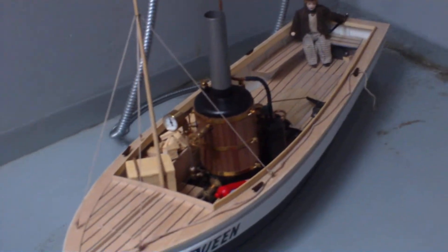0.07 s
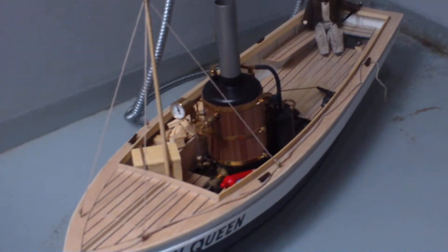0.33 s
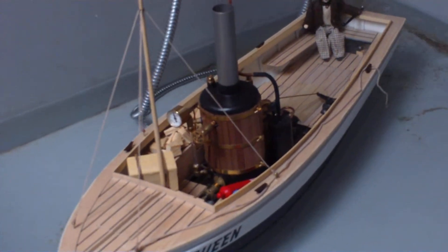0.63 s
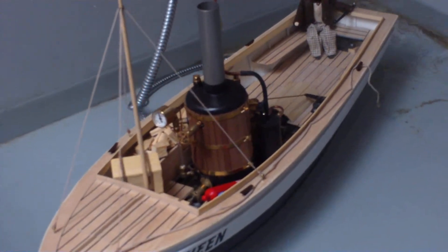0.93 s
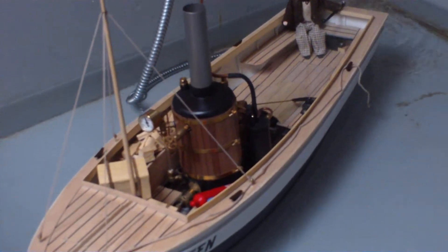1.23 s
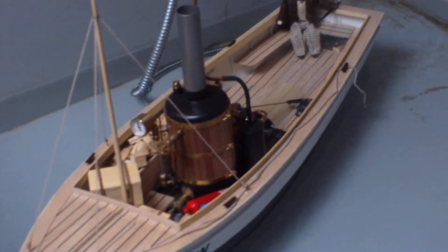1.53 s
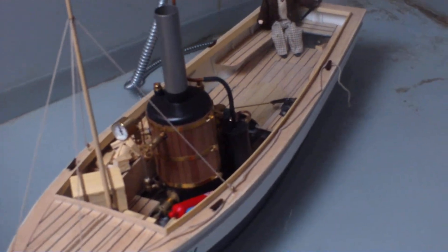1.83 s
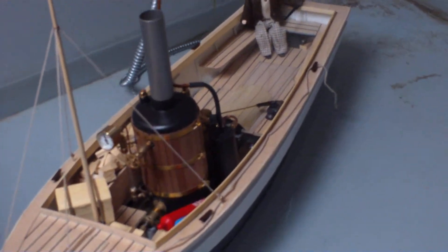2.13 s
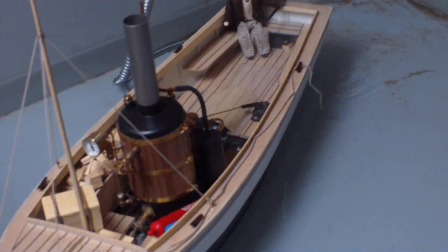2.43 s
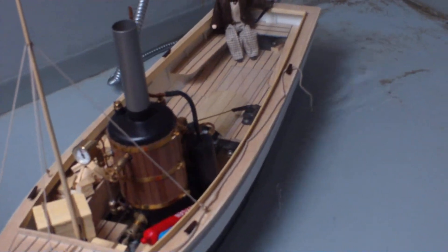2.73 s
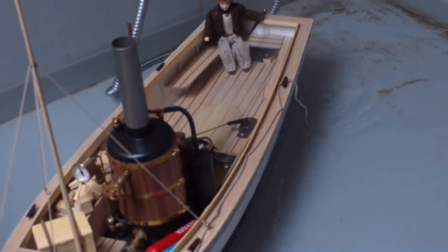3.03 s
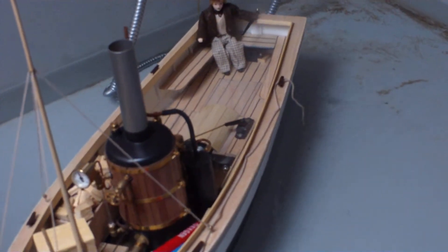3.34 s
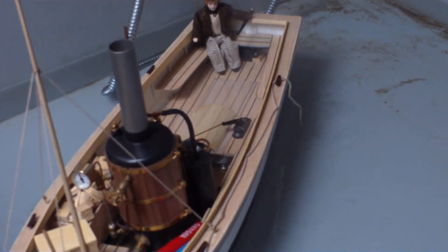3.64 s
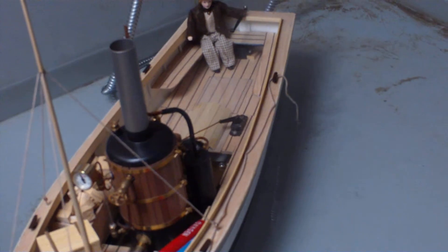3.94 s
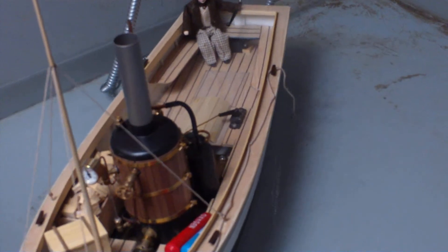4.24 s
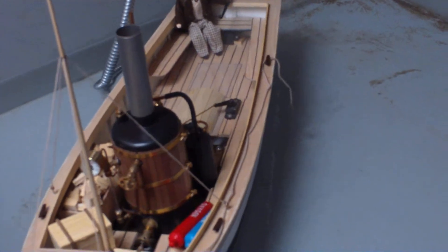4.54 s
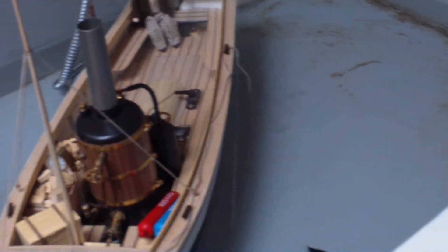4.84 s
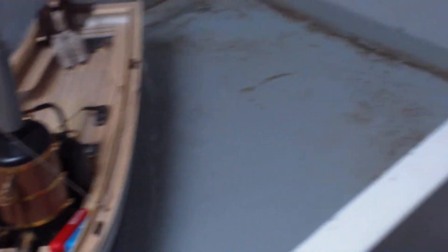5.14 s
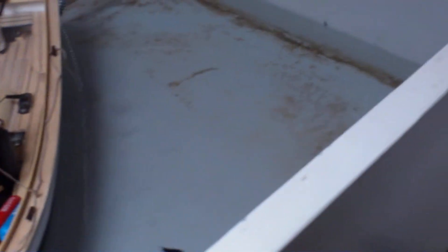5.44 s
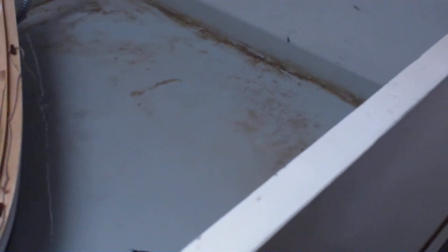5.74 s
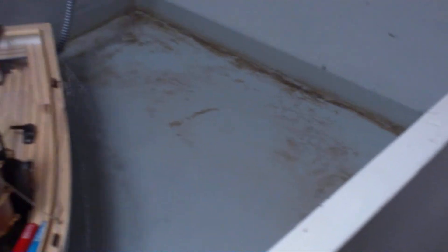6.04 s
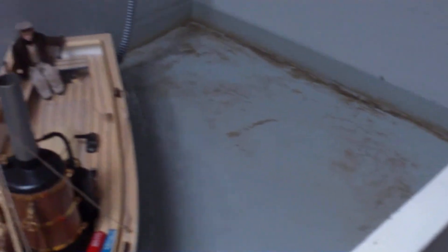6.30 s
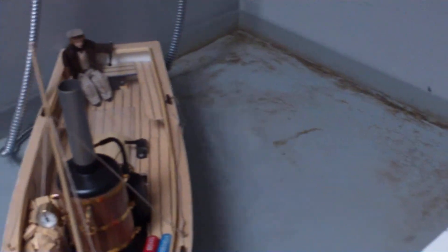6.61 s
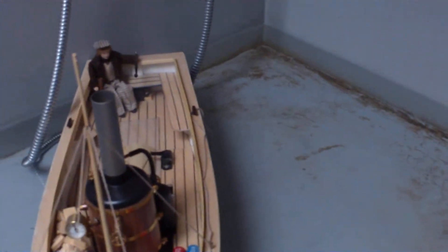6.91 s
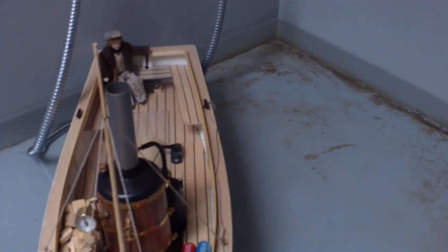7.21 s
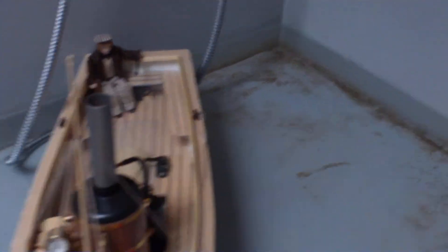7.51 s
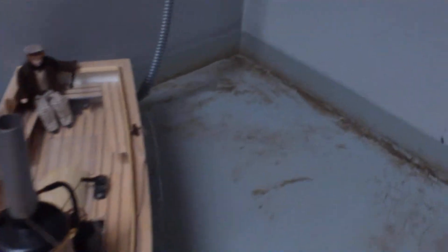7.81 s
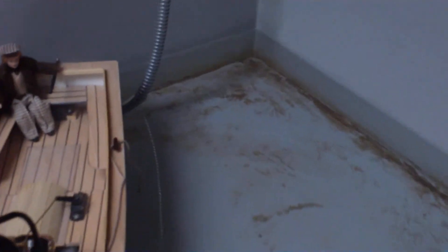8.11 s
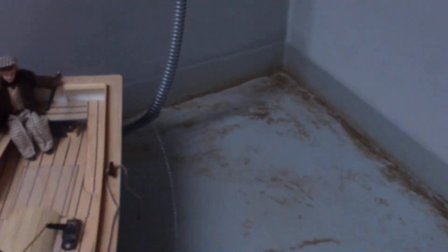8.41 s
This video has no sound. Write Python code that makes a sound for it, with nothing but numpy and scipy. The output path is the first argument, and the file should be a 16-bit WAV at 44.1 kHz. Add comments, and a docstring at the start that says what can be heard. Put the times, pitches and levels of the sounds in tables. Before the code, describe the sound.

Fast puffing and mechanical chatter from a miniature steam engine, stopping and starting once, over a gas burner's continuous hollow roar.

```python
"""A model steam launch floats in a small tank, its gas burner's roar fluttering in the flue throughout.
First the engine runs astern for a second: two puffs of steam a turn, over knocking rods, rattling gears
and a shaft that hums in the wooden hull. It stops, and steam leaks past the throttle. From 1.8 to 4.7 s
it runs ahead, and leaks again. The burner carries on, a soft bump passes at 5.8 s, and the rumble of
the open flame swells toward the end."""
import sys
import numpy as np
from scipy import signal
from scipy.fft import rfft, irfft, next_fast_len
from scipy.io import wavfile
from scipy.ndimage import uniform_filter1d

SR = 44100
rng = np.random.default_rng(int(sys.argv[2]) if len(sys.argv) > 2 else 0)


def to_wav(sig):
    """Store sig (one row per channel, or 1-D mono) as 16-bit WAV at the path in sys.argv[1].

    Samples outside -1..1 are clipped; the rate is SR.
    """
    pcm = np.clip(np.atleast_2d(sig), -1, 1) * 32767
    pcm = np.round(pcm).astype(np.int16)
    wavfile.write(sys.argv[1], SR, pcm.T)  # frames by channels


N = 377496
TIME = np.arange(N) / SR

# beats astern, one row a turn: start_s, main_puff_db, return_puff_db
ASTERN_PUFFS = [(0.041, -28.5, -30.5), (0.128, -31.5, -34), (0.215, -30, -31.5), (0.303, -26.5, -31.5),
                (0.39, -29.5, -30.5), (0.478, -31, -29.5), (0.566, -27, -33), (0.656, -30, -31.1),
                (0.743, -29, -34), (0.83, -29.5, -35)]
# beats ahead, starting slowly, overshooting and settling: start_s, main_puff_db
AHEAD_PUFFS = [(1.854, -27.5), (1.954, -23), (2.043, -21.5), (2.127, -23.0), (2.21, -21.5), (2.293, -23),
               (2.381, -24), (2.471, -24.5), (2.561, -25.5), (2.649, -23.5), (2.735, -23), (2.82, -25.5),
               (2.904, -24), (2.99, -23.5), (3.074, -23.7), (3.158, -22.8), (3.243, -23.3), (3.327, -23),
               (3.412, -23), (3.496, -23), (3.58, -22.5), (3.665, -23.5), (3.749, -23), (3.833, -23.0),
               (3.918, -23), (4.005, -26), (4.092, -23.5), (4.177, -23.5), (4.26, -23), (4.345, -23),
               (4.431, -22.5), (4.515, -22.5), (4.599, -23.5), (4.684, -30)]
# tone of the exhaust, valve gear, rod knocks and hull: frequency_hz, gain_db
EXHAUST_COLOUR = [(300, -19), (700, 1), (1050, 4), (1250, -8), (1700, -2.5), (2600, -1.5), (3300, -5),
                  (4000, -6.5), (4800, -0.5), (5900, -3), (6900, -11.5)]
VALVE_COLOUR = [(300, -31), (900, 1.5), (1800, -9), (3200, -3.5), (3900, -3), (4800, -6.5), (7000, -17)]
KNOCK_COLOUR = [(400, -17.5), (1500, -0.5), (2400, -1), (3400, -6), (4400, 0.5), (5400, 0.5), (6300, -3.5),
                (7200, -15.5)]
HULL_COLOUR = [(20, -41.5), (40, -30), (60, -11), (100, -28.5), (130, -8), (250, 0.5), (440, -0.5),
               (530, -3.5), (780, 11.5), (1200, 3), (2600, 0), (3300, -7), (5000, -7.5), (7000, -31)]
# resonances of the exhaust pipe each way, valve gear, rod knocks and hull: pitch_hz, width_hz, boost_db
ASTERN_PIPE = [(674, 67, 13), (1065, 23, 15), (1875, 54, 14), (2050, 70, 12), (2530, 57, 10), (4000, 90, 3),
               (4430, 200, 3)]
AHEAD_PIPE = [(613, 39, 9.1), (825, 70, 7.4), (950, 38, 16), (1409, 20, 22.6), (1677, 29, 7.3),
              (1744, 84, 8), (2200, 54, 2.1), (2810, 110, 4.9), (4010, 67, 4.2)]
VALVE_PEAKS = [(960, 49, 5), (1816, 37, 27.5), (2430, 37, 4.1), (4070, 60, 5.1)]
KNOCK_PEAKS = [(1990, 90, 7.7), (3560, 90, 5), (4500, 170, 5)]
HULL_PEAKS = [(247, 57, 4.2), (342.3, 12, 9.3), (379, 14, 6.8), (525, 10, 13), (610, 13, 10.2),
              (968, 22, 12.2), (1810, 59, 5.1), (2370, 110, 2.5)]
# the pipe's main note builds through the run ahead: time_s, gain_db
PIPE_NOTE_SWELL = [(1.9, -13), (3, -10), (3.9, -4), (4.6, -2)]
# ring of the brass valve rod: pitch_hz, t60_s, gain_db
ROD_RING = [(1850, .06, -2), (2060, .05, -5), (4450, 0.035, -5), (4840, 0.05, .5), (5210, 0.025, -4),
            (5780, .025, -8)]
# slack in the rod and crank knocks each turn: after_puff_s, against_puff_db, decay_s
ASTERN_KNOCKS = [(0, 7, .004), (.0185, 2, .0015)]
AHEAD_KNOCKS = [(-.0035, -4.5, 0.0057), (.002, 0.5, 0.0039), (.019, -4, .007), (.048, -7, 0.01)]
# load on the gears and shaft: time_s, level_db
ASTERN_LOAD = [(0, -32.5), (.55, -35), (.85, -34), (.93, -41.5), (1.0, -45.5), (1.15, -46)]
AHEAD_LOAD = [(1.7, -50), (1.81, -38.5), (1.9, -34), (2.05, -33), (2.5, -33), (2.9, -32), (4.65, -32),
              (4.78, -42), (4.98, -52)]
# harmonics of the shaft's hum: cycles_per_turn, gain_db
ASTERN_HUM = [(7, -26.5), (11, -12), (12, -16), (13, -29), (14, -14.5)]
AHEAD_HUM = [(5, -41), (7, -31), (11, -24.5), (12, -22), (13, -21), (14, -14), (15, -26.5), (16, -22),
             (17, -16.5), (18, -27), (19, -21.5), (20, -25.5), (21, -25.5)]
# drone of a hull panel: time_s, level_db
ASTERN_DRONE = [(0, -41), (.3, -42), (.55, -37.5), (.7, -46), (.9, -67), (1, -90)]
AHEAD_DRONE = [(1.7, -95), (1.95, -50), (2.1, -38.5), (2.3, -43), (2.5, -38), (2.75, -45.5), (4.6, -59),
               (4.8, -91)]

# slow moves of the burner: time_s, flue_pitch_hz, upper_mode_db, jet_hiss_db
FLAME_MOVES = [(0, 663, -38.5, -33), (.9, 604, -33, -34.5), (1.15, 640, -33.5, -37),
               (1.6, 620, -32.5, -36.5), (3, 632, -36, -35.5), (4.8, 642, -35, -36), (5.4, 647, -37, -37.5),
               (6.3, 672, -38.5, -37), (7.0, 652, -37, -36.5), (7.3, 670, -36, -37.5), (7.7, 685, -31, -36),
               (8.1, 687, -35.5, -36), (8.5, 669, -31.5, -36)]
# swells of the roar, burner mouth, funnel ring and boiler boom: time_s, level_db
ROAR_SWELL = [(0, -24), (.28, -24), (.47, -21), (.7, -22), (.92, -22.5), (1.2, -23), (1.5, -25),
              (1.77, -20.5), (1.95, -23.5), (4.1, -26.5), (4.4, -26.5), (5.1, -24), (5.35, -27.5),
              (5.65, -23.5), (6.2, -24), (6.45, -26), (6.62, -23), (6.8, -28), (7.0, -23.5), (7.3, -26.5),
              (7.45, -25.5), (8.28, -21.5), (8.42, -30), (8.56, -22.5)]
MOUTH_SWELL = [(0, -69.5), (6.6, -63.5), (7.3, -49), (7.9, -44.5), (8.3, -34), (8.56, -35.5)]
FUNNEL_SWELL = [(0, -5), (1.3, 6), (3, -5), (4.9, 3), (5.6, 3.5), (7.25, 2), (7.8, 3.5), (8.56, -4.5)]
BOOM_SWELL = [(0, -45.5), (1.1, -46), (1.7, -49.5), (3, -45), (5.6, -58.5), (7.2, -49.5), (8.4, -49)]
# glides of the upper flue mode and the gas jet's whistle: time_s, pitch_hz
UPPER_GLIDE = [(0, 1400), (1.2, 1407), (1.7, 1377), (3.3, 1398), (8.56, 1400)]
WHISTLE_GLIDE = [(0, 5580), (5, 5790), (6.3, 5710), (7.4, 5520), (8.1, 5800), (8.56, 5510)]
# brief dips in the roar's level, often just before a surge: centre_s, dip_db, half_length_s
ROAR_DIPS = [(0.12, -10, .011), (.543, -6, 0.025), (.627, -14, 0.016), (1.525, -4.5, .018),
             (1.62, -6, 0.0071), (1.716, -11, 0.014), (1.821, -6, 0.022), (1.954, -10, .018),
             (2.509, -12, 0.014), (4.49, -10, 0.011), (4.843, -4, .009), (4.883, -4.5, .014),
             (5.207, -5, .016), (5.692, -12, 0.0091), (5.737, -15, 0.011), (5.949, -7, 0.011),
             (7.083, -9, 0.0089), (7.398, -4.5, .01), (7.503, -3, .006), (7.665, -13, 0.0073)]
# brief loud surges in the fluttering roar: peak_s, level_db, length_s, pitch_hz
ROAR_SURGES = [(0.007, -14.5, 0.025, 635), (0.03, -15, 0.016, 633), (0.123, -13.5, 0.0094, 625),
               (0.137, -19.5, 0.011, 625), (0.195, -16.5, 0.017, 643), (0.36, -16.5, 0.0082, 627),
               (0.384, -14.5, 0.015, 608), (0.438, -17, 0.0076, 650), (0.491, -14.5, 0.01, 645),
               (0.508, -18.5, 0.0042, 605), (0.59, -17.5, 0.011, 670), (0.766, -12.5, 0.007, 660),
               (0.816, -8.5, 0.0057, 623), (0.871, -16.5, 0.01, 634), (0.911, -15, 0.0076, 630),
               (0.922, -14, 0.008, 634), (0.938, -18, 0.0051, 640), (1.066, -21, 0.01, 646),
               (1.11, -19.5, 0.0087, 630), (1.181, -18, 0.016, 664), (1.216, -18.5, 0.012, 615),
               (1.285, -16.5, 0.0076, 648), (1.303, -18.5, 0.011, 614), (1.63, -17.5, 0.0091, 606),
               (1.758, -18.5, 0.013, 638), (1.769, -15, 0.0087, 610), (1.789, -16.5, 0.018, 614),
               (3.385, -18, 0.024, 624), (3.883, -17, 0.019, 618), (4.221, -18, 0.013, 657),
               (4.387, -18, 0.037, 622), (4.611, -16, 0.012, 630), (4.767, -20, 0.018, 630),
               (4.858, -17.5, 0.007, 640), (4.928, -18, 0.01, 656), (5.101, -19.5, 0.0086, 655),
               (5.175, -21, 0.019, 622), (5.633, -19.5, 0.019, 634), (5.706, -15, 0.0094, 638),
               (5.752, -18, 0.0085, 648), (5.839, -19, 0.0091, 636), (5.962, -19, 0.007, 620),
               (6.079, -14, 0.011, 622), (6.102, -18, 0.0093, 664), (6.224, -16, 0.013, 617),
               (6.239, -17, 0.0071, 655), (6.926, -17.5, 0.014, 664), (7.097, -17, 0.0072, 635),
               (7.156, -20, 0.023, 648), (7.411, -14.5, 0.0061, 669), (7.491, -16.5, 0.009, 677),
               (7.513, -16, 0.0052, 680), (7.588, -18, 0.0091, 670), (7.675, -20.5, 0.01, 710),
               (7.833, -18, 0.012, 677), (7.873, -17.5, 0.011, 666), (7.965, -18, 0.024, 662),
               (7.99, -21, 0.018, 688), (8.19, -22, 0.0093, 696)]
# tone of the flame's rush, gas jet and burner mouth: frequency_hz, gain_db
RUSH_COLOUR = [(30, -58.5), (100, -30), (190, -20), (230, -16.5), (420, -9), (520, 3), (780, 9), (890, -16),
               (1100, -3.5), (1300, -3), (1600, -5.5), (2300, -17), (2800, -16), (5000, -39)]
JET_COLOUR = [(100, -37), (800, -21), (2000, 1.5), (3000, -1), (4200, 0.5), (5200, 2.5), (5700, 3.5),
              (6100, 1), (6700, -0.5), (7200, -8)]
MOUTH_COLOUR = [(30, -20), (90, -16), (130, -4.5), (180, -18), (260, -3), (330, -7.5), (420, 5),
                (800, -3.5), (950, -7), (1250, -9), (2600, -23), (3600, -7.5), (4300, -23.5), (7000, -36.5)]
# resonances of the rush and burner mouth: pitch_hz, width_hz, boost_db
RUSH_PEAKS = [(217, 39, 9.7), (510.4, 13, 7.9), (1720, 79, 2.7), (2250, 400, 6.8)]
MOUTH_PEAKS = [(930, 41, 25), (1120, 54, 14), (2100, 120, 11)]
# faint steady tones of the burner: pitch_hz, level_db
BURNER_TONES = [(124, -84), (2266, -51.5), (2311, -53), (2358, -57.5)]
# hollow side resonances of the funnel, shifting in balance: pitch_hz, start_db, end_db
FUNNEL_MODES = [(856.4, -41.5, -47), (978, -51.5, -38.5), (1070, -58.5, -44), (1178, -52, -48.5),
                (1250, -52, -50.5), (1336, -44.5, -48.5), (1456, -52.5, -44)]

# steam leaks after the throttle shuts: peak_s, level_db, half_length_s
STEAM_LEAKS = [(1.15, -37, 0.13), (4.769, -42, 0.17)]
# soft bumps: start_s, level_db
SOFT_BUMPS = [(5.82, -39.5)]
# tone of the leaks, room and bump: frequency_hz, gain_db
LEAK_COLOUR = [(1000, -20.5), (3500, -8), (5000, -1.5), (5700, 5), (6600, 3), (7200, -8.5)]
ROOM_COLOUR = [(20, -5.5), (35, -4.5), (58, 4.5), (90, -4.5), (130, 5), (200, -9), (1000, -8),
               (7000, -27.5)]
BUMP_COLOUR = [(20, -8), (45, 6.5), (90, -12), (140, 3.5), (300, 4), (450, 0.5), (900, -25), (3000, -55)]


def engine_astern():
    """A short run with two crisp beats a turn."""
    steam = exhaust(ASTERN_PUFFS, ASTERN_PIPE, gain_db=3, hold_s=0.0063, delays_s=(-0.0013, 0.0445),
                    decays_s=(0.013, 0.04), spit_db=0, tick_db=10, ring_db=7)
    gears = gears_and_shaft(ASTERN_PUFFS, ASTERN_LOAD, ASTERN_HUM, rattle_db=5.5, hum_db=0, rub_db=6.5)
    return steam + rod_knocks(ASTERN_PUFFS, ASTERN_KNOCKS) + gears + panel_drone(ASTERN_DRONE, hz=249.6)


def engine_ahead(return_db=-13):
    """A longer run: one long beat a turn, a faint return puff, and a wavering pipe note that builds."""
    puffs = [(s, db, db + return_db) for s, db in AHEAD_PUFFS]
    steam = exhaust(puffs, AHEAD_PIPE, gain_db=2.5, hold_s=0.011, delays_s=(0.0013, 0.055),
                    decays_s=(0.03, 0.038), spit_db=-0.3, tick_db=-9, ring_db=-6.5)
    gears = gears_and_shaft(puffs, AHEAD_LOAD, AHEAD_HUM, rattle_db=0.5, hum_db=4.5, rub_db=4.5)
    note = resonate(steam, 963 + 9 * drift(25), width_hz=52) * amp(curve(PIPE_NOTE_SWELL))
    return steam + note + rod_knocks(puffs, AHEAD_KNOCKS) + gears + panel_drone(AHEAD_DRONE, hz=248)


def exhaust(puffs, pipe, gain_db, hold_s, delays_s, decays_s, spit_db, tick_db, ring_db):
    """Each port opens with a metallic tick and blows down. Delays and decays are (main, return) pairs."""
    t = TIME[:SR // 8]
    flow, ticks, rings = np.zeros((3, N))
    crack = 1 + 0.32 * np.exp(-t / 0.0028)  # first burst as the port cracks open
    opening = (1 - np.exp(-(t / 0.001) ** 2)) * crack
    contact = 1 - np.exp(-(t / 0.0021) ** 2)
    tick = contact * np.exp(-t / 0.0094)
    for s, *levels_db in puffs:
        for db, delay_s, decay_s in zip(levels_db, delays_s, decays_s):
            start = s + delay_s
            puff = opening * np.exp(-np.maximum(t - hold_s, 0) / decay_s)
            add(flow, start, (amp(db) * puff) ** 2)
            add(ticks, start + 0.0017, amp(db + tick_db) * tick * noise(len(t)))
            for hz, t60, mode_db in ROD_RING:
                phase = 2 * np.pi * (hz * (1 + 0.01 * rng.standard_normal()) * t + rng.random())
                envelope = amp(db + ring_db + mode_db - 60 * t / t60) * contact
                add(rings, start + 0.0027, envelope * np.sin(phase))
    steam = unit_rms(noise() * amp(spit_db * drift(500)))  # spit_db: depth of wet steam's flicker
    chuffs = amp(gain_db) * body(steam * np.sqrt(flow), EXHAUST_COLOUR, pipe)
    return chuffs + body(ticks, VALVE_COLOUR, VALVE_PEAKS) + rings


def rod_knocks(puffs, pattern, spread_db=1.5):
    """The rod and crank take up their slack with short, bright clacks, as hard as the steam pushes."""
    t, clacks = TIME[:SR // 20], np.zeros(N)
    for s, puff_db, *_ in puffs:
        for delay_s, db, decay_s in pattern:
            force = amp(puff_db + db + spread_db * rng.standard_normal())
            add(clacks, s + delay_s, force * np.exp(-t / decay_s) * noise(len(t)))
    return body(clacks, KNOCK_COLOUR, KNOCK_PEAKS)


def crank_turns(puffs):
    """Running count of crank turns: one from each main puff to the next, smoothed by the flywheel."""
    s = np.asarray(puffs)[:, 0]
    speed = np.interp(TIME, (s[1:] + s[:-1]) / 2, 1 / np.diff(s))
    turns = np.cumsum(uniform_filter1d(speed, 8192)) / SR
    return turns - np.interp(s[0], TIME, turns)


def gears_and_shaft(puffs, load, harmonics, rattle_db, hum_db, rub_db, teeth=44):
    """Gear teeth knock in nearly the same pattern each turn; the shaft hums and rubs in the hull."""
    turns = crank_turns(puffs)
    start, end = load[0][0], load[-1][0]
    running = np.interp(TIME, [start - .1, start - .05, end - .1, end], [0, 1, 1, 0])
    effort = running * np.maximum(amp(curve(load)) - amp(-55), 0)
    tooth = np.floor(turns * teeth + .12 * drift(150)).astype(int)
    hits = np.flatnonzero(np.diff(tooth) > 0)
    bite = noise(teeth)  # each tooth has its own
    rattle = np.zeros(N)
    rattle[hits] = bite[tooth[hits] % teeth] + 0.31 * noise(len(hits))
    scrape = noise(SR // 50) * np.exp(-TIME[:SR // 50] / 0.0096)
    rub_power = signal.oaconvolve(rattle ** 2, scrape ** 2)[:N].clip(0)
    rub = unit_rms(np.sqrt(rub_power) * noise())
    shake = amp(rattle_db) * unit_rms(rattle) + amp(rub_db) * rub
    hum = np.zeros(N)
    for order, db in harmonics:
        level = amp(db + 1.2 * drift(2))
        hum += level * np.sin(2 * np.pi * (order * turns + rng.random()) + .5 * drift(3))
    return effort * (body(shake, HULL_COLOUR, HULL_PEAKS) + amp(hum_db) * hum)


def panel_drone(swell, hz, waver_db=2, slip_rad=0.7):
    """The shaft shakes a hull panel at the panel's own note, unsteadily."""
    level = amp(curve(swell) + waver_db * drift(32))
    return level * np.sqrt(2) * np.sin(2 * np.pi * hz * TIME + slip_rad * drift(10))


def burner():
    """The flame sounds the modes of the flue over the gas jet's hiss; the roar flutters, dips and surges."""
    flutter = drift(58)
    dip_db = sum(db * bell(TIME - s, length) for s, db, length in ROAR_DIPS)
    funnel_band = signal.butter(4, [490, 790], "band", fs=SR, output="sos")
    roar = signal.sosfilt(funnel_band, resonate(noise(), curve(FLAME_MOVES), width_hz=122))
    roar = steadied(roar, 0.57, window=1024) * amp(curve(ROAR_SWELL) - 1.4 + dip_db + 0.43 * flutter)
    surges, duck = roar_surges()
    upper = steadied(resonate(noise(), curve(UPPER_GLIDE), width_hz=43), 0.3)
    upper *= amp(curve(FLAME_MOVES, column=2) - 1.5)
    lift = 1 + 0.3 * (1 - duck)  # the broad rush rises with each surge
    rush = body(noise() * lift * amp(flutter + dip_db / 2), RUSH_COLOUR, RUSH_PEAKS) * amp(-33.5)
    return roar * duck + surges + upper + rush + gas_jet() + burner_tones()


def roar_surges(wander_rad=0.63):
    """Brief loud swells of tone near the roar's pitch, and a gain that ducks the roar under them."""
    surges, cover = np.zeros((2, N))
    around_peak = TIME[:SR // 5] - .1
    slip = wander_rad * drift(42)
    for s, db, length, hz in ROAR_SURGES:
        at = round(s * SR) + np.round(around_peak * SR).astype(int)
        inside = (at >= 0) & (at < N)
        at, t = at[inside], around_peak[inside]
        swell = bell(t, length * np.where(t < 0, 0.5, 0.68))  # quicker in than out
        tone = np.sqrt(2) * np.sin(2 * np.pi * (hz * t + rng.random()) + slip[at])
        surges[at] += amp(db) * swell * tone
        cover[at] += swell
    return surges, 1 - np.clip(0.99 * cover, 0, 1)


def gas_jet():
    """The gas jet hisses, with a breathy whistle on top."""
    hiss = body(noise(), JET_COLOUR) * amp(curve(FLAME_MOVES, column=3) + 0.68 * drift(18))
    whistle = unit_rms(resonate(noise(), curve(WHISTLE_GLIDE), width_hz=260))
    return hiss + amp(-52) * whistle


def burner_tones():
    """Faint tones of the burner, wavering very slightly in pitch together."""
    clock = np.cumsum(1 + .0006 * drift(3.2)) / SR
    return sum(amp(db) * np.sqrt(2) * np.sin(2 * np.pi * hz * clock) for hz, db in BURNER_TONES)


def burner_mouth(flutter_db=-2):
    """The open flame's rumble, swelling toward the end."""
    return body(noise() * amp(flutter_db * drift(25)), MOUTH_COLOUR, MOUTH_PEAKS) * amp(curve(MOUTH_SWELL))


def hollow_ring():
    """The flame's noise rings the side resonances of the funnel and the low one of the boiler."""
    ring = np.zeros(N)
    for hz, start_db, end_db in FUNNEL_MODES:
        mode = steadied(resonate(noise(), hz, width_hz=42.5), 0.32)
        ring += mode * amp(np.linspace(start_db, end_db, N))
    boom = unit_rms(resonate(noise(), hz=340, width_hz=50))
    return ring * amp(curve(FUNNEL_SWELL)) + boom * amp(curve(BOOM_SWELL))


def steam_leak():
    """Steam sighs past the shut throttle for a moment after each run."""
    swell = sum(amp(db) * bell(TIME - s, length) for s, db, length in STEAM_LEAKS)
    return body(noise(), LEAK_COLOUR) * swell


def tank_reverb(x, t60_s=0.077, wet_db=-9, echoes_per_s=2500):
    """Hard walls close by give a short, dense tail; being small, they reflect little bass."""
    t = TIME[:SR // 3]
    echoes = noise(len(t)) * (rng.random(len(t)) < echoes_per_s / SR)
    tail = echoes * amp(-60 * t / t60_s) * (t > .003)
    tail = signal.sosfilt(signal.butter(2, 900, "high", fs=SR, output="sos"), tail)
    return x + amp(wet_db) * signal.oaconvolve(x, tail / np.linalg.norm(tail))[:N]


def room_tone(room_db=-58):
    """A bed of low room rumble, with one soft, dull bump."""
    t, push = TIME[:SR], np.zeros(N)
    for s, db in SOFT_BUMPS:
        add(push, s, amp(db) * (1 - np.exp(-t / 0.005)) * np.exp(-t / 0.081))
    bump = body(noise() * push, BUMP_COLOUR)
    return amp(room_db) * body(noise(), ROOM_COLOUR) + bump


def body(x, colour, peaks=(), size=8192):
    """Causal filter of unit energy: a broad colour with resonances standing on it."""
    hz = np.abs(np.fft.fftfreq(size, 1 / SR))
    colour_hz, colour_db = np.transpose(colour)
    power = amp(np.interp(np.log(hz + 1), np.log(colour_hz), colour_db)) ** 2
    power *= 1 + sum((amp(db) ** 2 - 1) / (1 + (2 * (hz - pitch) / width) ** 2)
                     for pitch, width, db in peaks)
    log_gain = .5 * np.log(np.maximum(power, 1e-10))
    minimum_phase = np.exp(np.conj(signal.hilbert(log_gain)))
    ring = np.fft.ifft(minimum_phase).real[:size // 2]
    return signal.oaconvolve(x, ring / np.linalg.norm(ring))[:N]


def resonate(x, hz, width_hz):
    """A steep-sided resonance whose pitch can glide."""
    carrier = np.exp(2j * np.pi * np.cumsum(hz * np.ones(N)) / SR)
    pole = np.exp(-np.pi * width_hz / SR)
    envelope = signal.lfilter([(1 - pole) ** 2], [1, -2 * pole, pole * pole], x / carrier + 1e-18)
    return 2 * (carrier * envelope).real


def steadied(x, amount, window=3072):
    """A flame-driven tone limits its own swing: compresses it, then scales to rms 1."""
    power = np.abs(uniform_filter1d(x ** 2, window) + 1e-12)
    return unit_rms(x / power ** (amount / 2))


def drift(hz):
    """Random wobble of rms 1, up to about hz."""
    step = 64 if hz < 100 else 16
    count = next_fast_len(N // step + 2)
    slow = irfft(rfft(noise(count)) * bell(np.fft.rfftfreq(count, step / SR), hz), count)
    return unit_rms(np.interp(np.arange(N) / step, np.arange(count), slow))


def curve(rows, column=1):
    """An automation lane: one column of a table, drawn through time."""
    rows = np.asarray(rows)
    return np.interp(TIME, rows[:, 0], rows[:, column])


def add(mix, start_s, sound):
    """Drops a sound into the mix."""
    part = mix[max(round(start_s * SR), 0):][:len(sound)]
    part += sound[:len(part)]


def bell(x, half_width):
    """A smooth hump, 1 at its centre."""
    return np.exp(-(x / half_width) ** 2)


def noise(count=N):
    """White noise."""
    return rng.standard_normal(count)


def amp(db):
    """Decibels to gain."""
    return 10 ** (np.asarray(db) / 20)


def unit_rms(x):
    """Scales to rms 1."""
    return x / np.sqrt(np.mean(x ** 2) + 1e-20)


def scene():
    """The mono mix; only the engine feeds the tank's reverb."""
    boiler = burner() + burner_mouth() + hollow_ring() + steam_leak()
    engine = tank_reverb(engine_astern() + engine_ahead())
    return (engine + boiler + room_tone())[None]


def record(dry):
    """A steep high cut at 7290 Hz takes the air off the top."""
    high_cut = signal.firwin(401, 7290, window=("kaiser", 8), fs=SR)
    return signal.oaconvolve(dry, high_cut[None], "same")


dry = scene()
out = record(dry)
to_wav(out)
```